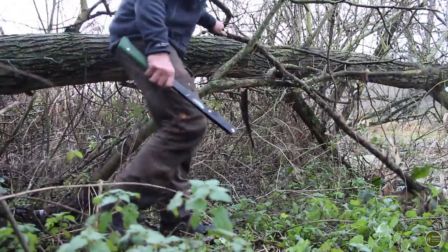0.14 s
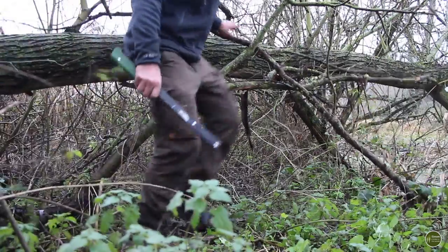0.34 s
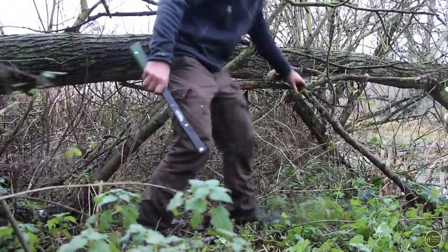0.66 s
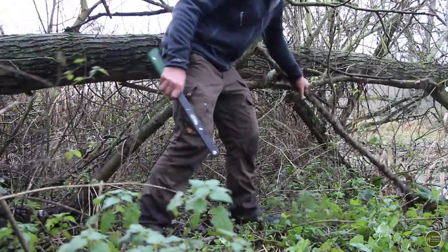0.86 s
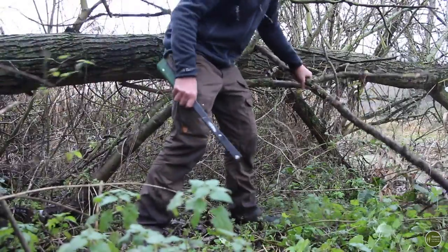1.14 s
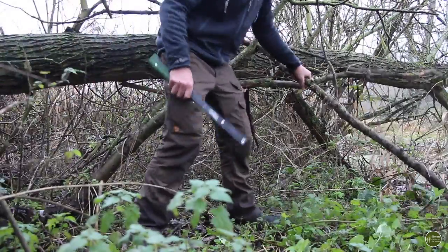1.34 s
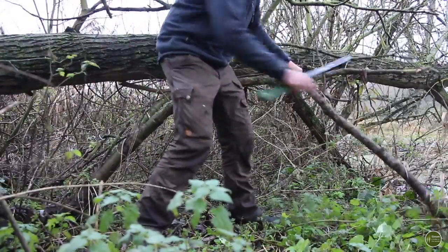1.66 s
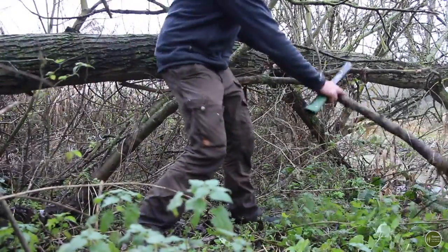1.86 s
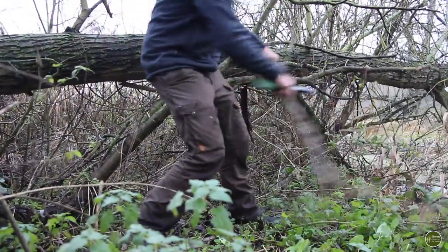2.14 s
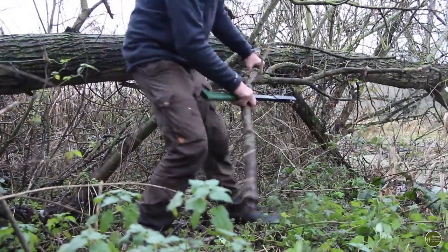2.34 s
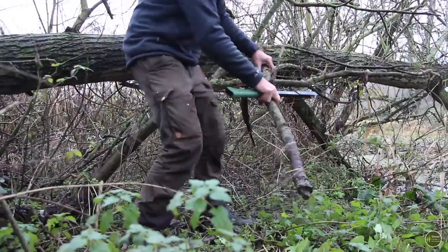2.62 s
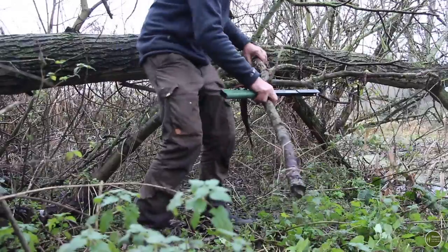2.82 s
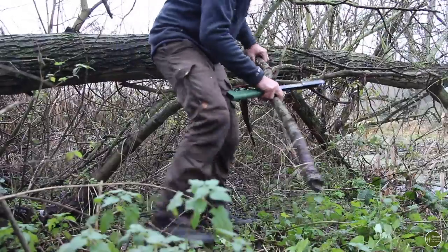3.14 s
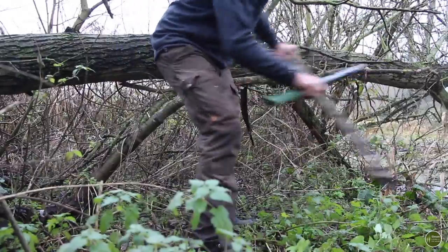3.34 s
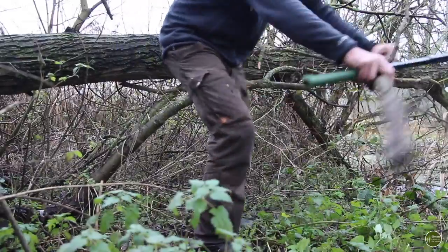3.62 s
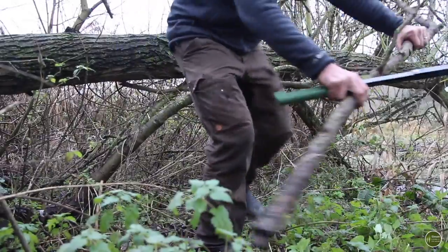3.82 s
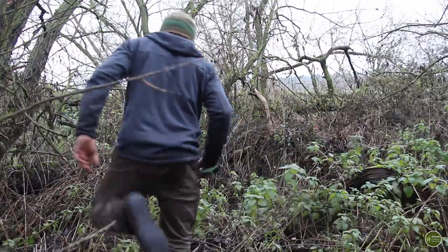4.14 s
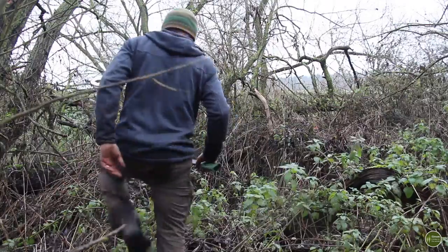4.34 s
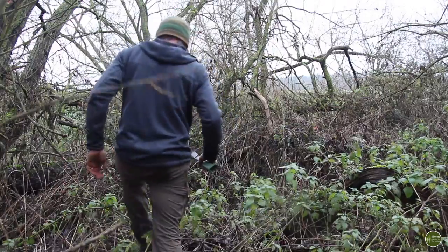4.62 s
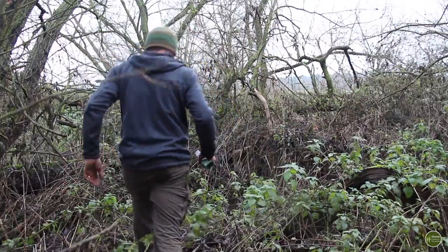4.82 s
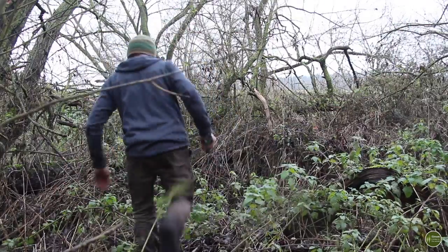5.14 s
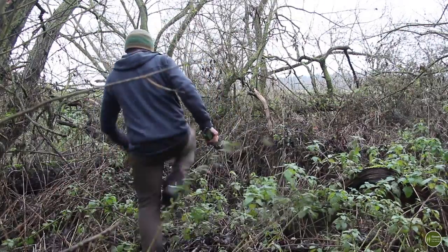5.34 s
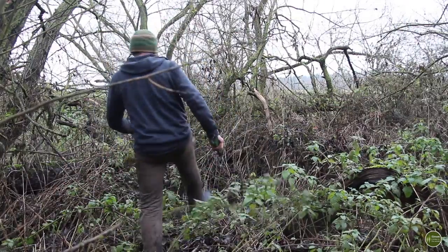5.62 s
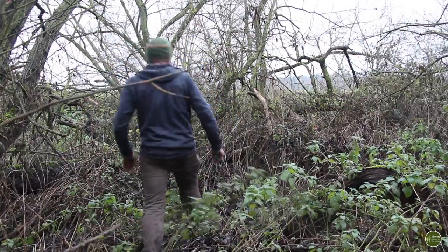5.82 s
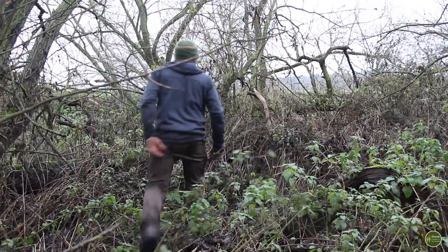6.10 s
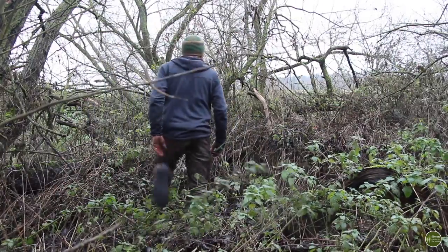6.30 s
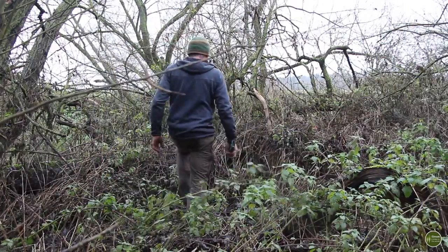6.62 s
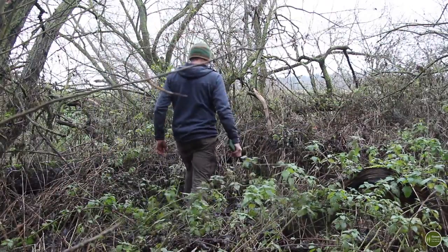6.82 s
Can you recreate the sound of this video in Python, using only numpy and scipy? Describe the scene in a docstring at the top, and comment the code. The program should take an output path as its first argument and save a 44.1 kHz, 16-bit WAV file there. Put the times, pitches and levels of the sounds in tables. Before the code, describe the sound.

A person pulls out a dead branch in tangled brush. Crisp snaps and leafy scuffing lead to sharp cracks, thin metallic clinks from a hand saw and hollow wood knocks, then a dense crunching burst. The low road murmur with faint engine drones becomes quieter and duller as the spot changes, and the person tramples off with scattered twig snaps. Mono, dry outdoor sound, close at first.

```python
"""A far road hums under a soft rustle of brush, then twigs start to snap as a person drags out a dead branch.
Road and rustle are shaped noise, and two far engines are sine tones.
Wood knocks and twig snaps are noise bursts through resonances; the pruning saw's blade rings as a bank of
damped sine modes. One microphone with gain control hears it all, and the person walks off through the brush."""
import sys
import numpy as np
from scipy import signal
from scipy.fft import rfft, irfft, next_fast_len
from scipy.io import wavfile
from scipy.ndimage import uniform_filter1d

SR = 44100
rng = np.random.default_rng(int(sys.argv[2]) if len(sys.argv) > 2 else 0)


def materialize(psi):
    """Save the field psi as 16-bit PCM at rate SR to the path in sys.argv[1].

    A 1-D psi becomes a single channel; in a 2-D psi each row is a channel.
    """
    bounded = np.clip(np.atleast_2d(psi).T, -1, 1)
    quanta = np.round(bounded * 32767).astype(np.int16)
    wavfile.write(sys.argv[1], SR, quanta)


N = 306936


def gain_of(db):
    """Decibels to gain."""
    return 10 ** (np.asarray(db) / 20)


def evened(x):
    """Scaled to rms 1."""
    return x / np.sqrt(np.mean(x ** 2) + 1e-20)


def peaked(x):
    """Scaled to peak 1."""
    return x / (abs(x).max() + 1e-12)


def read_spectrum(points, hz):
    """Reads dB between spectrum points on a log frequency axis."""
    point_hz, value = np.transpose(points)
    return np.interp(np.log(hz + 1), np.log(point_hz + 1), value)


def add(mix, start_s, sound):
    """Mixes a sound in at start_s seconds."""
    part = mix[round(start_s * SR):][:len(sound)]
    part += sound[:len(part)]


def band(x, lo_hz, hi_hz):
    """Causal band-pass."""
    return signal.sosfilt(signal.butter(2, [lo_hz, hi_hz], "band", fs=SR, output="sos"), x)


def ring(x, hz, width_hz):
    """Two-pole resonance: the wider it is, the faster it dies."""
    r = np.exp(-np.pi * width_hz / SR)
    return signal.lfilter([1, 0, -1], [1, -2 * r * np.cos(2 * np.pi * hz / SR), r * r], x)


def smooth_noise(width, count):
    """Slow noise: white noise averaged twice over width samples, rms 1."""
    return evened(uniform_filter1d(uniform_filter1d(rng.standard_normal(count), width), width))


# Colour of the far road before and after the switch at 4.13 s. # Each row: frequency in Hz, relative density in
# dB per Hz.
ROAD_BEFORE = [(15, -47), (25, -28.5), (84, 4), (180, -2.5), (326, -10), (531, -10), (818, -3.5),
               (1040, -4.5), (1840, -15), (3160, -21), (4870, -27.5), (6560, -31.5), (7510, -32),
               (14000, -33), (16000, -41)]
ROAD_AFTER = [(15, -38), (25, -27), (53, 2.5), (87, 2.5), (123, -2), (317, -18), (451, -14.5),
              (516, -12.5), (1020, -9.5), (1610, -14.5), (1890, -15.5), (3340, -23), (4370, -29.5),
              (14000, -30), (16000, -36)]
ROAD_BEFORE_DB, ROAD_AFTER_DB = -38.5, -44  # rms
SWITCH_S, SWITCH_FADE_S = 4.13, 0.01


def road():
    """Far traffic blurs into noise with drifting patches; its colour and level switch within 10 ms at 4.13 s."""
    frames, hz = N // 512 + 5, np.fft.rfftfreq(2048, 1 / SR)
    real, imaginary, patches = rng.standard_normal((frames, 1025, 3)).T
    drift = evened(uniform_filter1d(uniform_filter1d(patches, 14, 0), 6, 1))  # over frequency, then time
    cells = (real + 1j * imaginary) * gain_of(1.3 * drift)

    def coloured(points):
        shaped = cells * gain_of(read_spectrum(points, hz))[:, None]
        return evened(signal.istft(shaped, nperseg=2048, noverlap=1536)[1][:N])

    first = gain_of(ROAD_BEFORE_DB) * coloured(ROAD_BEFORE)
    second = gain_of(ROAD_AFTER_DB) * coloured(ROAD_AFTER)
    switched = np.interp(np.arange(N) / SR, [SWITCH_S, SWITCH_S + SWITCH_FADE_S], [0, 1])
    return (1 - switched) * first + switched * second


# Far lorry. Each row: time in seconds, firing rate in Hz, its level in dB, level of its octave in dB.
LORRY_ENGINE = [(0.0, 53.7, -52, -45), (0.5, 55.4, -45, -48), (2.01, 55.7, -47, -51),
                (3.91, 56.2, -49.5, -42), (4.15, 62.1, -54, -70), (4.49, 66, -57, -75),
                (4.87, 66.9, -63, -55), (5.18, 64, -55, -62), (5.6, 61, -59, -50)]
# Far car. Each row: time in seconds, tone in Hz, level in dB.
CAR_ENGINE = [(0.0, 67, -52), (0.15, 69.1, -42.5), (1.15, 65.3, -59), (1.85, 75.8, -45), (1.93, 79.2, -54),
              (3.65, 107.9, -46.5), (3.9, 108.6, -52), (4.1, 110.6, -54)]


def engines():
    """Low tones follow the engine speeds and waver a little; each drops out after its last row."""
    t, out = np.arange(N) / SR, np.zeros(N)
    for rows in (LORRY_ENGINE, CAR_ENGINE):
        time_s, hz, *levels = np.transpose(rows)
        turns = np.cumsum(np.interp(t, time_s, hz)) / SR
        for harmonic, db in enumerate(levels, 1):
            waver_db = 0.73 * smooth_noise(3000, N)
            gain = gain_of(np.interp(t, time_s, db, right=-90) + waver_db)
            out += gain * np.sqrt(2) * np.sin(2 * np.pi * harmonic * turns)
    return out


# Steady shifting of the brush between shoves. Each row: time in seconds, twig rustle level in dB.
STEADY_SHIFTING = [(0.0, -40.5), (0.9, -50), (1.3, -43), (1.7, -44.5), (2.4, -41), (2.75, -49), (3.7, -40),
                   (4.5, -45.5), (5.3, -53.5), (6.1, -52), (6.7, -66), (6.96, -55)]
SHIFTING_STEMS_DB, SHIFTING_LEAVES_DB = -4, -5.5  # relative to the twigs
# Shoves, tugs and steps in the brush. Each row: start in seconds, hold in seconds, twig rustle level in dB,
# heavy stems in dB relative to the twigs, dry leaves in dB relative to the twigs.
BRUSH_SHOVES = [(0.026, .02, -39, 0, -6), (0.142, 0.064, -35.5, -5, -5), (0.275, .04, -28.5, -3, -4.5),
                (0.529, 0.048, -37.5, -2.5, -5.5), (0.623, .07, -34.5, -1.5, -5),
                (1.045, .09, -29.5, -6, -3.5), (1.948, .15, -29.5, -28, -2), (2.142, 0.096, -26.5, -2, -3),
                (2.454, 0.037, -37, -1, -4), (2.594, .03, -38.5, -14, -6), (2.984, 0.017, -40.5, 3.5, -9),
                (3.205, .05, -42.5, 4.5, -17), (3.312, .03, -32.5, -3.5, -6.5),
                (3.39, 0.042, -28, -0.5, -6.5), (3.441, .06, -20.5, -4.5, -7.5),
                (3.526, .08, -25.5, -8, -4.5), (3.678, 0.045, -35.5, -0.5, -6),
                (3.81, .06, -34.5, -2.5, -8), (3.992, 0.09, -32, -1.5, -5), (4.185, 0.015, -41, -20, -8),
                (4.352, .03, -42.5, -1.5, -3.5), (4.902, .08, -32, -2.5, -4),
                (5.025, 0.08, -36.5, -2.5, -4), (5.368, 0.053, -42.5, 1.5, -6.5),
                (5.552, .08, -42.5, -0.5, -3.5), (5.717, .06, -40, -5.5, -5), (5.813, .04, -33, -6.5, -5.5),
                (5.999, 0.033, -40.5, -2.5, -2.5), (6.14, 0.023, -43.5, -3, -3), (6.28, .02, -45.5, -5, -6),
                (6.454, .03, -44, -5, -4), (6.94, .03, -38, -2, -6.5)]
SWELL_DB_PER_S, SETTLE_DB_PER_S = 219.5, 171.5  # how fast a shove builds and the brush comes to rest


def stir():
    """Gains of twigs, stems and leaves: each shove swells, holds and settles over the steady shifting."""
    t = np.arange(0, N / SR + .01, .002)
    start, hold, db, stems_db, leaves_db = np.transpose(BRUSH_SHOVES)[:, :, None]
    swell_db = SWELL_DB_PER_S * np.maximum(start - t, 0)
    settle_db = SETTLE_DB_PER_S * np.maximum(t - start - hold, 0)
    shove_db = db - swell_db - settle_db
    steady_db = np.interp(t, *np.transpose(STEADY_SHIFTING))
    gains = []
    for rest_db, push_db in ((0, 0), (SHIFTING_STEMS_DB, stems_db), (SHIFTING_LEAVES_DB, leaves_db)):
        power = gain_of(steady_db + rest_db) ** 2 + (gain_of(shove_db + push_db) ** 2).sum(0)
        gains.append(np.interp(np.arange(N) / SR, t, np.sqrt(power)))
    return gains


# Microphone and body colour of the rustle. Each row: frequency in Hz, relative density in dB per Hz.
RUSTLE_COLOUR = [(59, -31), (100, 8), (255, -4), (358, -3), (535, -5.5), (768, -2.5), (1870, 2.5),
                 (3120, 5), (4380, 3), (10900, -11), (16000, -13)]


def rustle(twig_gain, stem_gain, leaf_gain):
    """Thousands of tiny ticks of uneven size in clumps, over the hiss of sliding leaves."""
    ticks = rng.random(N) < 600 / SR  # about 600 a second
    size = gain_of(3.2 * np.minimum(rng.exponential(1, N), 5)) * ticks
    scratches = uniform_filter1d(size, size=30) * rng.standard_normal(N)  # each tick is a short scratch
    clumps = gain_of(2.64 * smooth_noise(500, N))
    drive = clumps * (evened(scratches) + rng.standard_normal(N))
    fft_size = next_fast_len(N)
    colour = gain_of(read_spectrum(RUSTLE_COLOUR, np.fft.rfftfreq(fft_size, 1 / SR)))
    coloured = irfft(rfft(drive, fft_size) * colour, fft_size)[:N]
    stems = evened(band(coloured, 164, 1000))
    twigs = evened(band(coloured, 1750, 3810))
    leaves = evened(band(coloured, 4510, 21000))
    return twig_gain * twigs + stem_gain * stems + leaf_gain * leaves


def thud(db, hz, ring_s, noise):
    """A soft blow of a few milliseconds rings one low wood mode."""
    t = np.arange(len(noise)) / SR
    blow = noise * (t / .002) * np.exp(-t / 0.0032)
    mode = ring(blow, hz, 2.9 / max(ring_s, .005))  # longer ring, narrower resonance
    return gain_of(db) * peaked(mode + .1 * band(blow, 200, 2500))


# Thick wood knocking. Each row: start in seconds, peak in dB, ring in Hz,
# ring time setting in seconds (sets the resonance width, at least 5 ms).
WOOD_THUDS = [(2.115, -29, 920, 0.11), (2.205, -17.5, 1080, 0.045), (2.311, -20.5, 1044, 0.032),
              (3.408, -19.5, 363, 0.089), (3.447, -10.5, 1050, 0.031), (3.534, -11.5, 1000, 0.025),
              (3.752, -20.5, 1030, 0.047), (3.845, -24.5, 417, 0.033), (4.067, -19, 690, 0.018),
              (4.085, -15.5, 487, 0.0098), (4.85, -24, 273, 0.029), (4.874, -25, 269, 0.04),
              (4.903, -17.5, 238, 0.034), (4.936, -16.5, 1280, 0.013), (5.362, -26, 926, 0.014),
              (5.509, -28, 775, 0.027), (5.538, -29, 706, 0.03), (5.571, -31, 422, 0.017),
              (5.844, -28, 707, 0.033), (6.757, -28, 604, 0.018), (6.91, -24, 300, 0.018),
              (6.94, -30, 500, 0.022)]


def thuds():
    """Thick wood knocks, each driven by fresh noise."""
    out = np.zeros(N)
    for start_s, *row in WOOD_THUDS:
        add(out, start_s, thud(*row, rng.standard_normal(4000)))
    return out


# Modes of the saw blade. Each row: centre frequency in Hz, relative level in dB, time to fall 60 dB in seconds.
BLADE_MODES = [(1790, -10, .1), (2100, -3, .055), (2400, -3, .055), (2750, -5, .05), (3050, -4, .05),
               (3330, 0, .055), (3680, -1, .05), (4200, -5, .04), (5400, -20, .04), (7140, -19, .05),
               (8210, -16, .06), (9800, -17, .05), (10750, -14, .06), (11300, -14, .07), (12340, -13, .07),
               (13410, -11, .08), (14360, -8, .1), (15050, -10, .08), (15400, -9, .09)]
# Knocks on the blade. Each row: start in seconds, jingle in dB (modes over 5 kHz), clink in dB (modes below).
BLADE_KNOCKS = [(1.9051, -9, -9.5), (1.9695, -25, -38), (1.986, -21, -20.5), (2.0025, -20, -25),
                (2.03, -22, -29), (2.0534, -29, -23), (2.0707, -22, -20.5), (2.0936, -48, -33),
                (2.2304, -34, -21), (2.2596, -36, -26), (2.5656, -43, -15), (2.586, -27, -22),
                (2.6214, -31, -46), (3.614, -31, -25), (3.6556, -31, -23.5), (3.728, -47, -31),
                (3.7823, -44, -29.5), (3.8641, -30, -32), (3.901, -46, -28)]


def saw():
    """Each knock rings the flexing blade: modes split into close neighbours, damped unevenly by loose parts."""
    out, t = np.zeros(N), np.arange(5000) / SR
    hz, db, t60 = (np.tile(column, reps=3)[:, None] for column in np.transpose(BLADE_MODES))
    for start_s, jingle_db, clink_db in BLADE_KNOCKS:
        where, phase, bend = rng.random((3, len(hz), 1))
        split = np.where(hz > 5000, .025, .04) * (bend - .5)
        # where the knock lands weakens each mode by up to 16 dB
        level_db = db + np.where(hz > 5000, jingle_db, clink_db) - 16 * where
        modes = gain_of(level_db - 60 * t / t60) * np.sin(2 * np.pi * (hz * (1 + split) * t + phase))
        shake = uniform_filter1d(rng.standard_normal((len(hz), len(t) // 50)), size=3, axis=1)
        chatter = evened(uniform_filter1d(np.repeat(shake, 50, axis=1), size=50, axis=1))
        rattled = modes * (1 + .4 * chatter)
        add(out, start_s, rattled.sum(0) * np.minimum(t / 0.001, 1))
    return out


def snap(db, hz, thud_db, fizz_db, t60, rise, noise):
    """A crack: a quick dying burst, sharp at its start, rings briefly; thick wood thuds, bark fizzes."""
    t = np.arange(len(noise)) / SR
    after = np.maximum(t - rise, 0)
    direct = gain_of(-60 * after / max(t60, .003))
    scattered = gain_of(-19 - 60 * after / .07)  # the brush around throws a little back
    tear = noise * (direct + scattered) * np.minimum(t / max(rise, 5e-5), 1) ** 2
    tear = tear + 5.6 * (np.arange(len(t)) == round(rise * SR))  # the break itself is one sharp click
    tear = tear + 0.035 * np.roll(tear, round(0.001277 * SR)) * (t > .0013)  # bounce off the ground
    twig = peaked(ring(tear, hz, 650)) + .7 * peaked(band(tear, 0.53 * hz, 1.29 * hz))
    body = peaked(band(twig, 1300, 1.67 * hz))
    thick_wood = gain_of(thud_db) * peaked(band(tear, 270, 1460))
    bark = gain_of(fizz_db) * peaked(band(tear, 4480, 12300))
    return gain_of(db) * (body + thick_wood + bark)


# Sharp cracks: twigs breaking or whipping, and some knocks on the saw. Each row: start in seconds, peak of the
# ring in dB, # ring in Hz, thud in dB relative to that peak, fizz in dB relative to that peak, burst's time to
# fall 60 dB in seconds # (at least 3 ms), rise in seconds (at least 0.05 ms).
SHARP_CRACKS = [(0.1318, -24, 2750, -19, 2, 0.022, 0.00031), (0.2647, -16.5, 2840, -1, 1, 0.021, 0.00062),
                (0.2879, -20, 3250.0, -9, -12, 0.008, 0.0003), (0.3543, -13.0, 2300, -18, 0.5, 0.01, 0.00007),
                (0.4059, -17.5, 2870, -29, -5, 0.012, 0.00035),
                (0.6369, -25.5, 1550.0, 7.5, 15, 0.022, 0.000096), (0.68, -21, 1530.0, 0, 6, 0.0069, 0.00011),
                (0.695, -18.5, 2500, -10, -2, 0.0071, 0.00037), (0.7219, -22, 3620, -15, -8, 0.012, 0.000078),
                (0.7713, -6.5, 5800, -10, 5.5, 0.0026, 0.0004), (1.0287, 7, 3410, -17, -2, 0.014, 0.000073),
                (1.1356, -14, 1820, -6.0, -21, 0.056, 0.0041),
                (1.1658, -4.5, 2360, -13, -3.5, 0.0026, 0.000048),
                (1.2565, -17.5, 3280, -26, -5, 0.012, 0.0012),
                (1.2908, -16.5, 2630, -32.5, -22, 0.0055, 0.001),
                (1.424, -7, 3174, -32, -10, 0.0089, 0.000077), (1.6263, -25.5, 3150, -21, -7, 0.034, 0.00084),
                (1.869, -18.5, 4300, -13, 9.5, 0.0074, 0.00018), (1.9035, 6, 3270, -14.5, -7, 0.029, 0.0027),
                (1.9695, -15, 2660, -25, -18, 0.015, 0.00015), (2.002, -9.5, 3480, -16.5, -14, 0.05, 0.0011),
                (2.0698, -12.5, 2560, -16, -18, 0.009, 0.002), (2.094, -10, 3760, -48.5, -19, 0.015, 0.0017),
                (2.118, -13.5, 2806, -6.5, -5.5, 0.16, 0.0018), (2.1305, -13, 2620, -22, -14, 0.01, 0.00031),
                (2.1368, -0.5, 3650, -9.5, 0, 0.015, 0.00011), (2.1737, -15, 3140.0, 0, 15, 0.0064, 0.00012),
                (2.1926, -7.5, 3100, -4.5, 5.5, 0.008, 0.00012),
                (2.2312, -13, 2920, -19, -15, 0.018, 0.000095), (2.392, -20, 2730, -2, -26, 0.006, 0.00015),
                (2.4765, -34, 2730.0, -10, 10, 0.008, 0.00055),
                (2.5666, -8.5, 3170, -32, -8.5, 0.0093, 0.000069),
                (2.588, -17.5, 3120, -22, -13, 0.031, 0.00023), (2.5943, -26, 2100, -25, -16, 0.012, 0.0019),
                (2.9673, -22, 3170, -27, -20, 0.012, 0.0011), (3.3151, -21, 1830.0, 1, 4, 0.016, 0.00019),
                (3.336, -16.5, 3030.0, -12, -1, 0.015, 0.0016), (3.4484, -11, 1663, 0, -10, 0.013, 0.0014),
                (3.466, -7, 1570, -21, -4, 0.045, 0.00097), (3.4826, -3.5, 2100, -2, -6, 0.034, 0.00085),
                (3.5006, -5, 2590, -20, -6, 0.011, 0.0042), (3.5394, -15, 2080.0, 4, -18, 0.026, 0.0016),
                (3.5733, 0.5, 2430, -7, -1, 0.045, 0.0022), (3.613, -16.5, 3050, -30, -11.0, 0.092, 0.00076),
                (3.6563, -19, 2374, -5, -17, 0.029, 0.0029), (4.0373, -15.5, 2160.0, -23, -5, 0.0072, 0.0009),
                (4.1627, -33, 3340, -6, -1, 0.0093, 0.0002), (4.2135, -28, 2600, -20, -18, 0.011, 0.00026),
                (4.309, -28, 2840, -21, 2, 0.011, 0.0002), (4.3383, -32.5, 1560, 12, -11, 0.012, 0.00008),
                (4.3786, -37, 5330, 10, 20, 0.012, 0.00017),
                (4.4567, -32.5, 1930.0, 10.5, -14.0, 0.0063, 0.0002),
                (4.6262, -19.5, 3300, -8, -1.5, 0.025, 0.00011), (4.6405, -24.5, 3110, -7, 2, 0.013, 0.00015),
                (4.7176, -6, 2510, -12.5, 1.5, 0.0096, 0.0011),
                (4.7611, -2, 2510, -12, 1.5, 0.0093, 0.000087), (4.7998, -3, 2550, -10, 0, 0.0086, 0.00015),
                (4.9031, -7, 3250, -4, -1, 0.015, 0.001), (4.9571, -20, 1670, 3, 5, 0.011, 0.00011),
                (5.0313, -10.5, 2710, -3, -2.5, 0.023, 0.00066),
                (5.0792, -12, 3100, -7, -7.5, 0.021, 0.00068), (5.399, -21, 2650, -13, -17, 0.031, 0.00073),
                (5.8275, -23, 3200, -10, -10, 0.0058, 0.0001), (5.847, -33, 2900, -4, -2, 0.0067, 0.00018),
                (5.9743, -19, 3000, -7, -6, 0.0063, 0.00015), (6.0105, -14.5, 2600, -4, -10, 0.0054, 0.00027),
                (6.0145, -10, 2630, -18, -13, 0.026, 0.0026), (6.9082, -14, 2740, -5, -2.5, 0.035, 0.0008)]


def snaps():
    """Cracks come one by one, each from fresh noise."""
    out = np.zeros(N)
    for start_s, *row in SHARP_CRACKS:
        add(out, start_s, snap(*row, rng.standard_normal(4000)))
    return out


def scene():
    """Everything reaches one microphone, copied to both channels."""
    background = road() + engines()
    brush = rustle(*stir())
    return np.tile(background + brush + thuds() + saw() + snaps(), (2, 1))


HISS_DB = -74  # each channel's own faint hiss
EDGE_HZ = 15800  # top of the microphone's band


def record(dry):
    """Gain control ducks the sound after loud cracks; peaks clip; hiss; then the band limit."""
    power = uniform_filter1d((dry ** 2).mean(0), 300, origin=149)  # over the last 300 samples
    power_db = 10 * np.log10(abs(power) + 1e-12)
    fall_db = np.arange(N) * 39.0 / SR  # the held level falls 39 dB a second
    held_db = np.maximum.accumulate(power_db + fall_db) - fall_db
    over_db = np.maximum(held_db + 13, 0)  # threshold -13 dB
    duck_db = 0.51 * uniform_filter1d(over_db, 200, origin=99)
    clipped = np.clip(dry / gain_of(duck_db), -1, 1)
    hissing = clipped + gain_of(HISS_DB) * rng.standard_normal(dry.shape)
    low_pass = signal.firwin(511, EDGE_HZ, window=("kaiser", 9), fs=SR)
    return signal.oaconvolve(hissing, low_pass[None], "same")


dry = scene()
out = record(dry)
materialize(out)
```